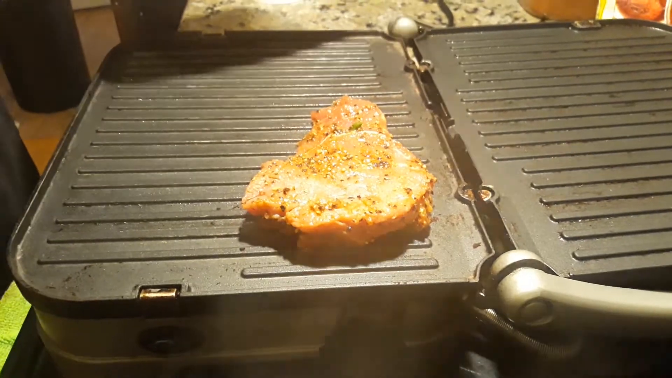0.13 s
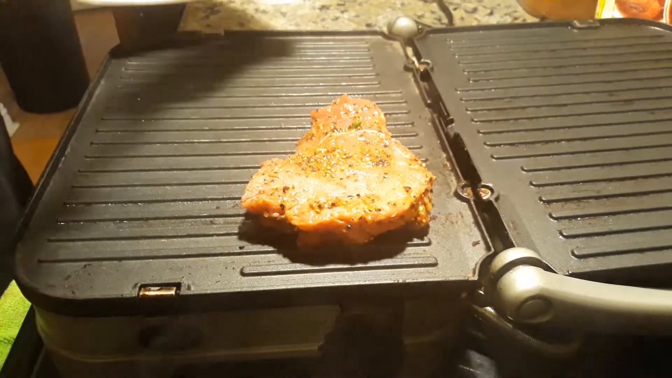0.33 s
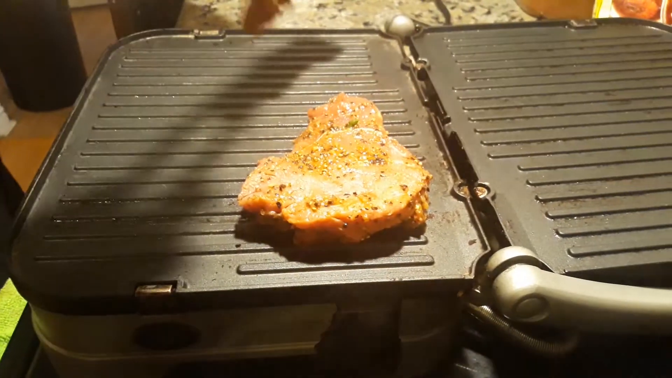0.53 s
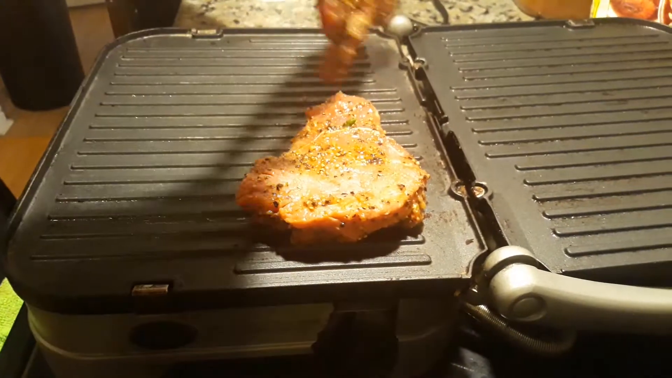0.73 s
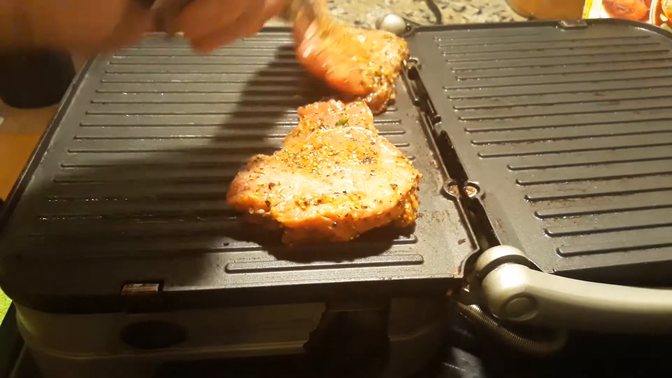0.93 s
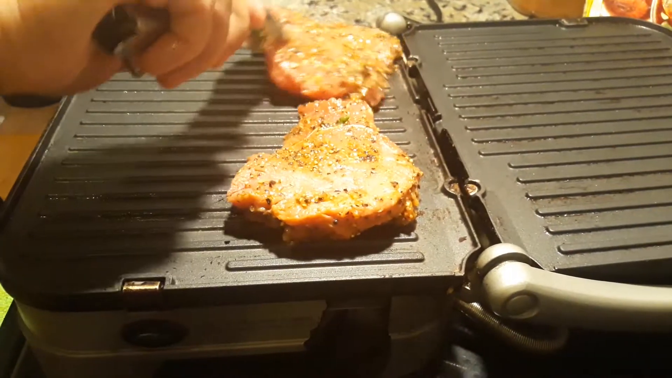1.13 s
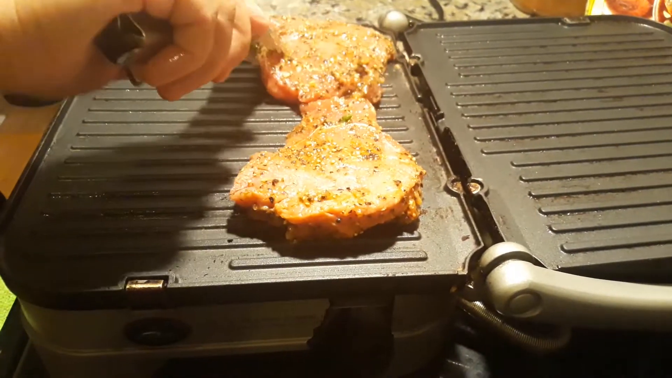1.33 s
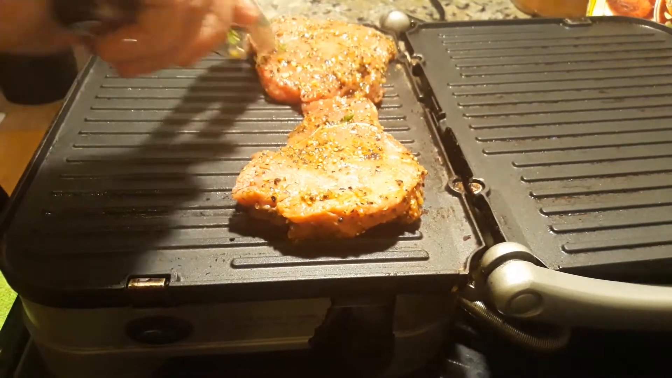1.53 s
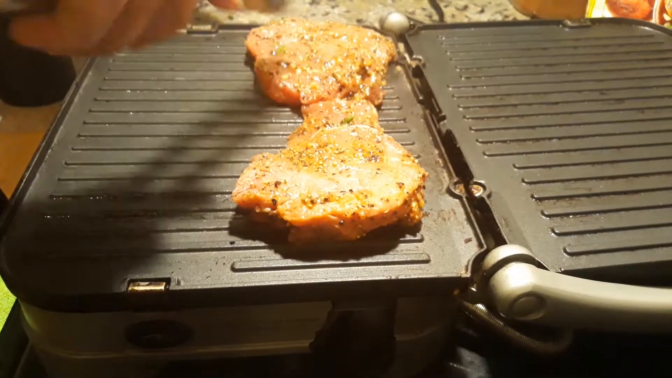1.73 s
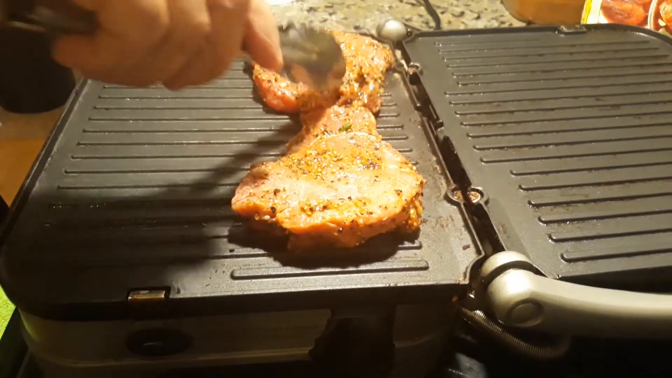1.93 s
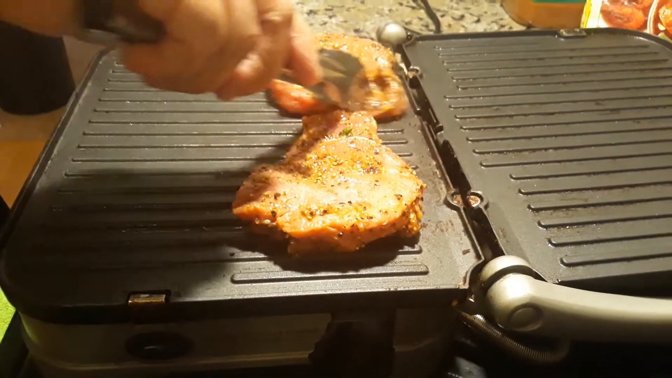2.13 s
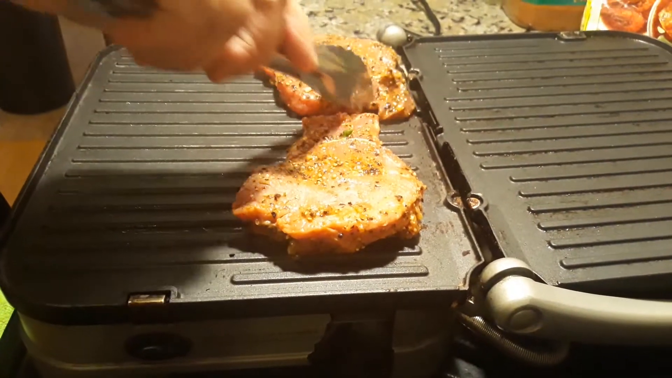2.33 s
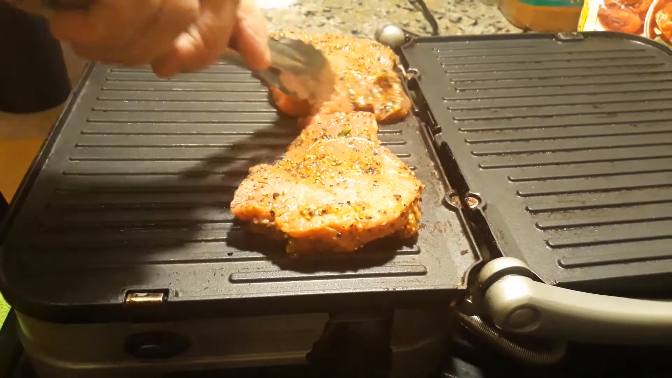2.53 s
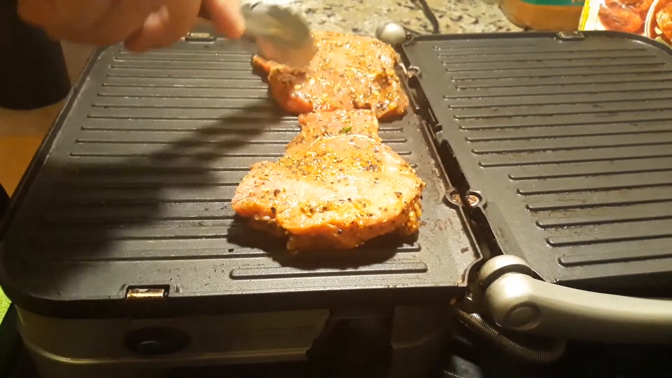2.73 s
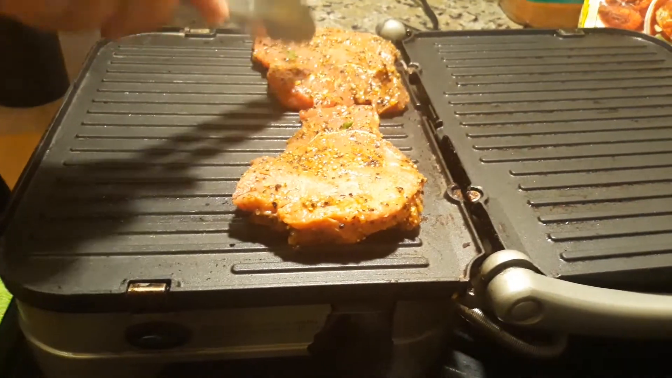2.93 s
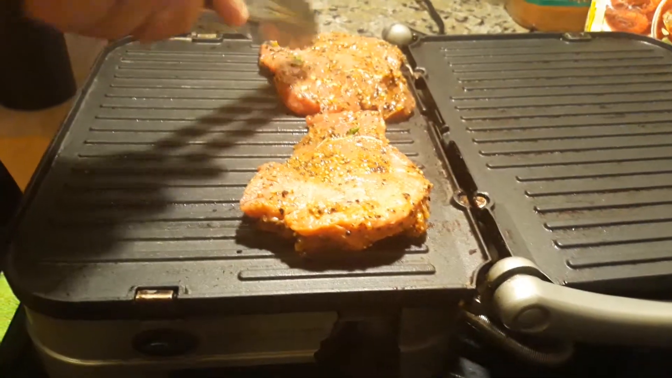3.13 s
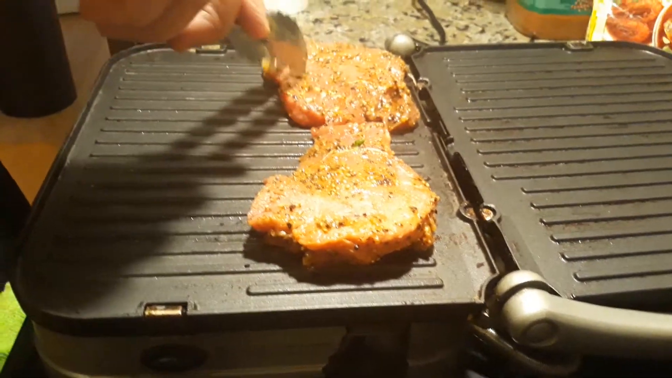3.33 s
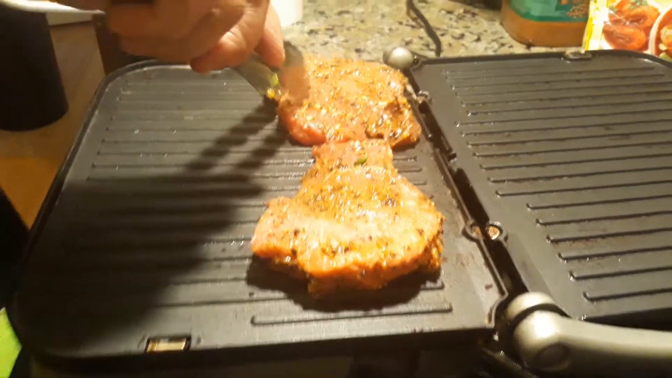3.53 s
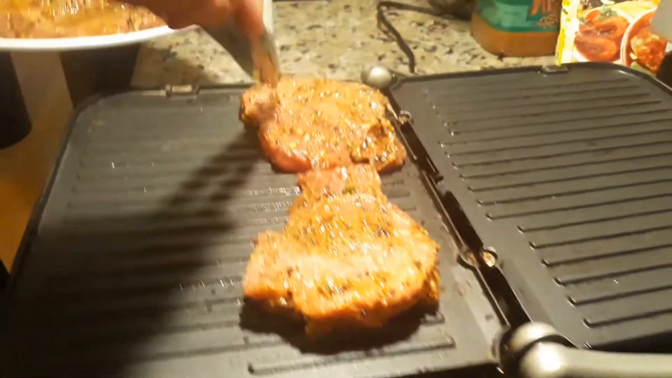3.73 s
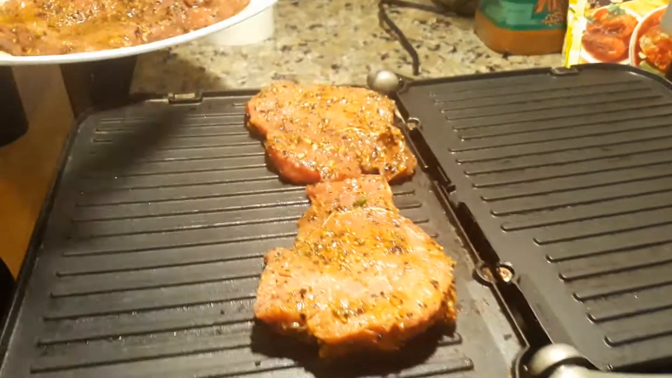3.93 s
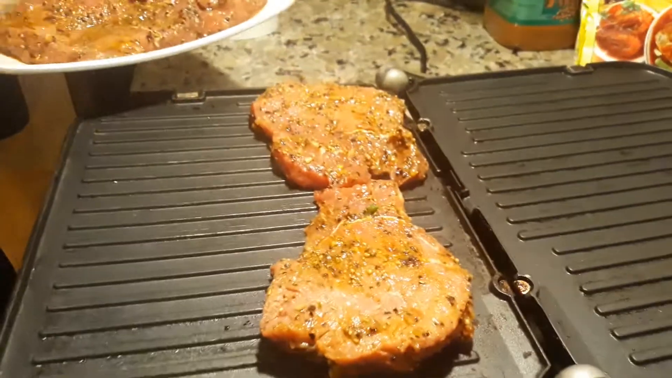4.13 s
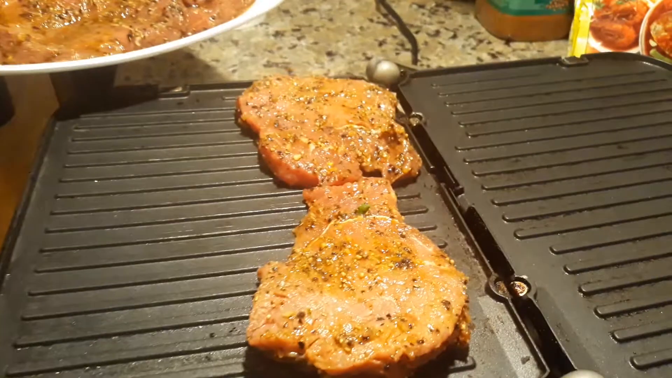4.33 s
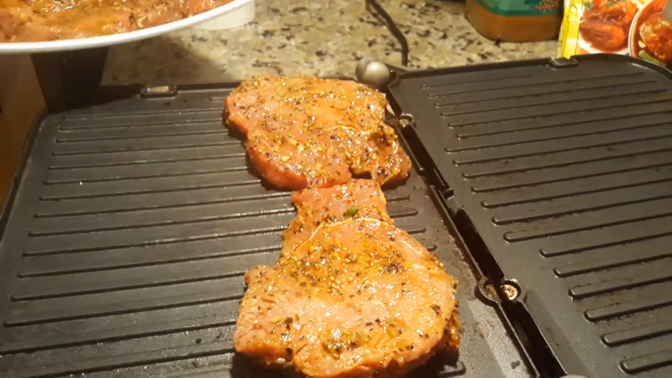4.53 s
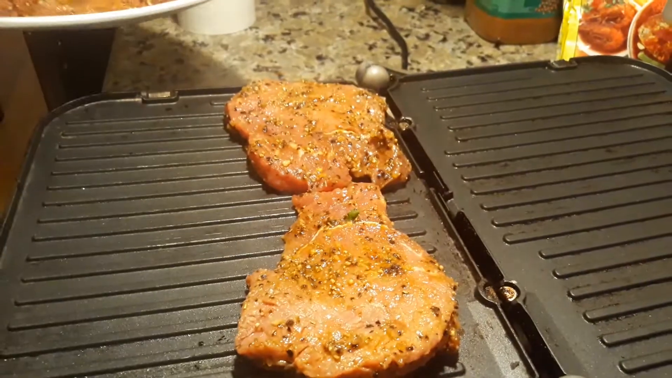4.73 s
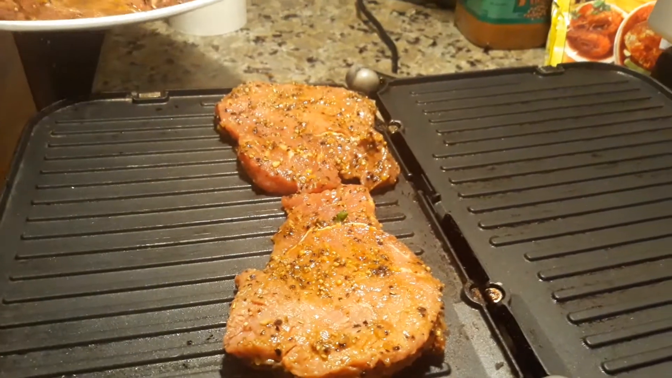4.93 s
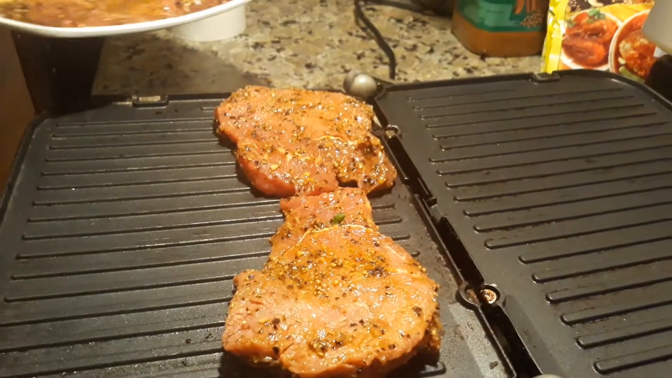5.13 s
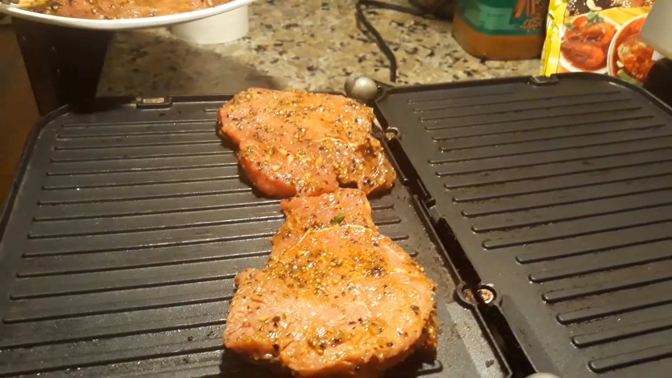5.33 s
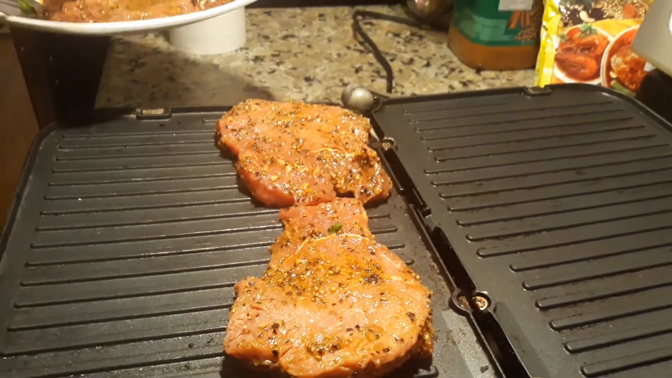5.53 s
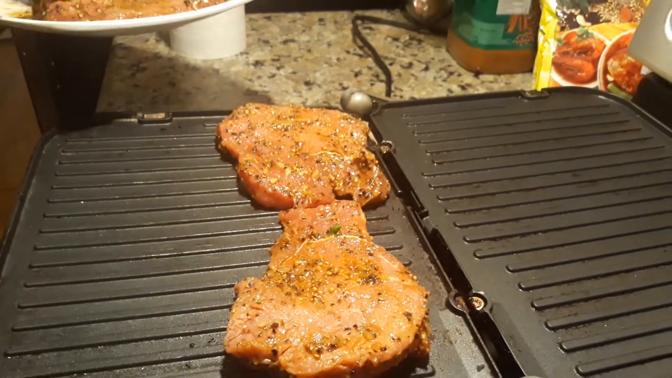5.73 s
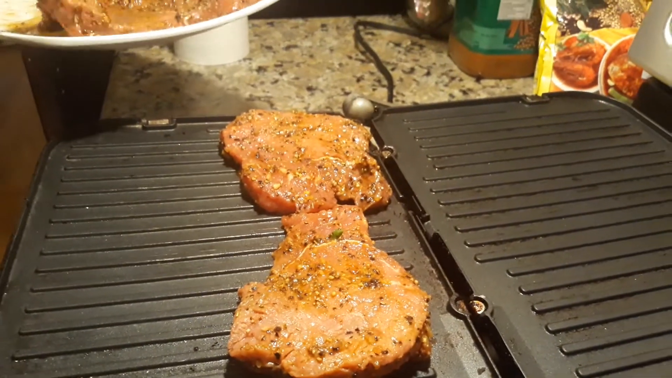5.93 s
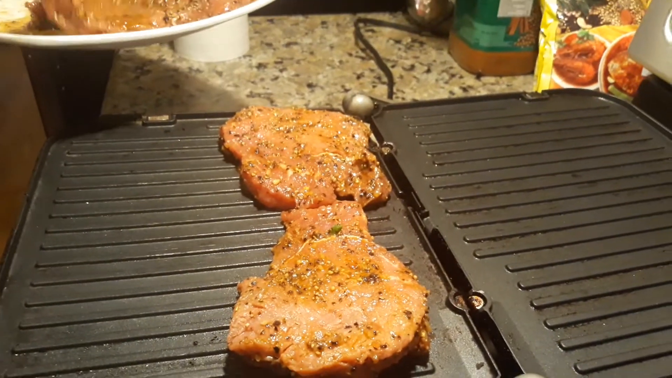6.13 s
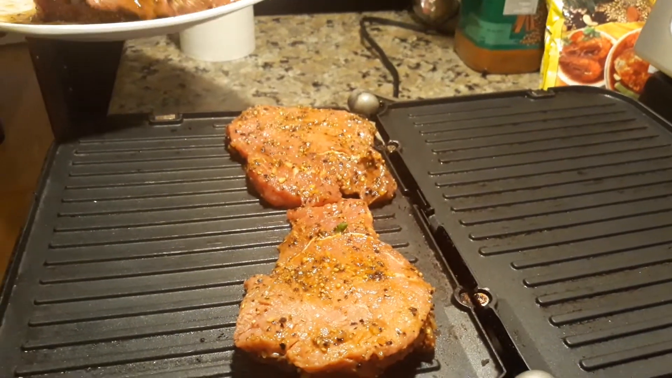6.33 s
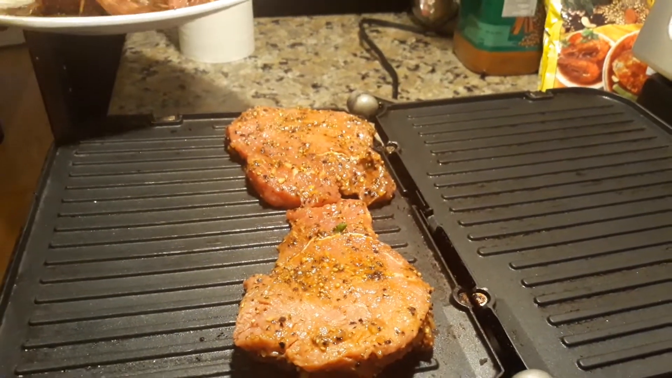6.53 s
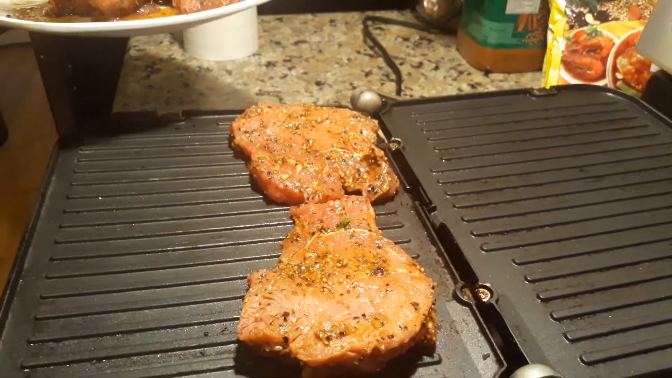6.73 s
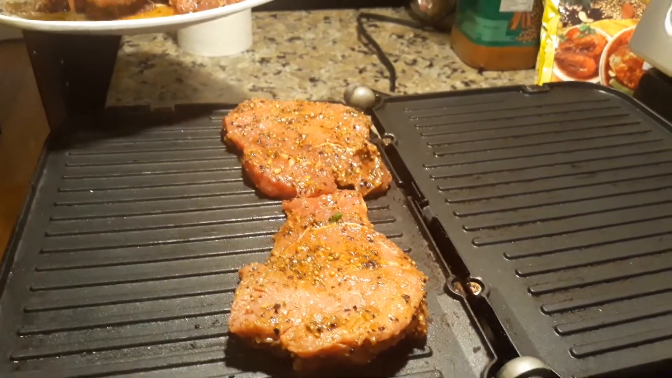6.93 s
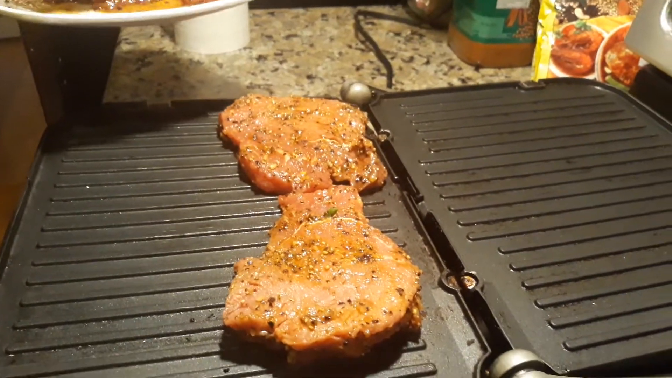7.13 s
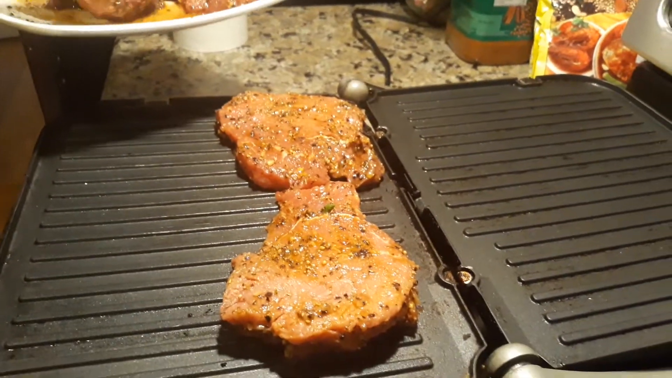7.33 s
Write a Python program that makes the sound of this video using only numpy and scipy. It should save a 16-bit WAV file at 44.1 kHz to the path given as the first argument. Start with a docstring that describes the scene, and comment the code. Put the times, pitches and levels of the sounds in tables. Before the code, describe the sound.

Close, crisp frying hiss with tiny fat spits surges when more meat is laid on, then gradually dries out above soft fan drone.

```python
"""Meat sizzles on a ridged electric grill in a kitchen, heard from a phone just above it, over a droning fan.
First it fries while an arm reaches over: the right side gets louder, a low rumble swells, fat spits.
At about 0.8 s a second, wet piece flops down; the sizzle swells, steam sounds the grooves, noise bands pass.
Kitchenware knocks softly at 3 s; from 3.5 s the groove note sinks and fat spits again.
From 4 s the sizzle sinks as the meat dries, with a last group of knocks at 6.4 s.
"""
import sys
import numpy as np
from scipy import signal
from scipy.fft import rfft, irfft, next_fast_len
from scipy.io import wavfile

SR = 44100
rng = np.random.default_rng(int(sys.argv[2]) if len(sys.argv) > 2 else 0)


def wav_out(sig):
    """Save sig, one row per channel (or a flat mono array), as 16-bit PCM at SR to the path in sys.argv[1]."""
    wavfile.write(sys.argv[1], SR, np.round(np.clip(np.atleast_2d(sig).T, -1, 1) * 32767).astype(np.int16))


N = 329868
T = np.arange(N) / SR
LEFT_RIGHT_HALVES = np.array([[.5], [-.5]])  # shares a left-minus-right lean between the channels

# spectrum of the sizzle: (frequency [Hz], density [dB per Hz])
SIZZLE_COLOUR = [(1000, -24), (1400, -17), (1850, -13.5), (2100, -9), (2500, -7), (3200, -4), (3900, -4),
                 (4600, -3), (6000, -1), (7200, -0.5), (8000, -7.5), (8700, -7.5), (10700, -9), (12400, -5),
                 (15600, -4.5)]
# stereo lean of the sizzle: (frequency [Hz], left minus right [dB])
SIZZLE_LEAN = [(60, -7), (110, 0.0), (200, 0.5), (380, 1.0), (700, 3), (1290, 5), (2380, 3), (4400, -2.5),
               (8120, -1.0), (15000, 0)]
# arm over the grill: (start [s], attack [s], hold [s], release [s])
ARM_REACH = (0.31, 0.68, 0.2, 0.72)
REACH_RIGHT_DB = 4
FRY_DB = -28.5  # reference level of the first piece
SPATTER_DB, FIZZ_START_DB, MIST_DB = -13.5, -9.5, -2.5  # relative to FRY_DB
FIZZ_FADE_DB_PER_S = 0.42
MIST_LAG = 0.55  # share of a rise in dB that the mist band does not follow


def sizzle():
    """One crackle split into four rising bands (spatter, fry, fizz, mist), each with its own level."""
    boil_db = boiling()
    popping = crackle()
    popping = popping + undb(-10.5) * chirps(per_s=800, lo_hz=1898.6, hi_hz=12986, ring_s=0.0035, spread_db=1.0)
    popping = shape(
        popping,
        lambda hz: contour(SIZZLE_COLOUR, hz) * contour(SIZZLE_LEAN, hz) ** LEFT_RIGHT_HALVES)

    spatter_db = SPATTER_DB + 0.78 * walk(9.8)
    fry_db = -0.42 + 0.3 * walk(21)
    fizz_db = FIZZ_START_DB - FIZZ_FADE_DB_PER_S * T + 0.41 * walk(20)
    mist_db = MIST_DB - MIST_LAG * np.maximum(boil_db, 0) + 0.54 * walk(25)

    spatter = unit(band(popping, 1090, 2600, order=24)) * undb(spatter_db)
    fry = unit(band(popping, 2530, 8500, order=24)) * undb(fry_db)
    fizz = unit(band(popping, 8820, 11380, order=24)) * undb(fizz_db)
    mist = unit(band(popping, 11180, 17600, order=24)) * undb(mist_db)
    right_db = REACH_RIGHT_DB * envelope(*ARM_REACH) * np.array([[0], [1]])
    return (spatter + fry + fizz + mist) * undb(FRY_DB + boil_db + right_db)


def crackle(count=8):
    """Several spots under the meat, each spitting in its own uneven spurts."""
    out = 0
    for _ in range(count):
        spurts = undb(0.93 * np.tanh(walk(9)) + 1.2 * np.tanh(walk(50)))
        spot = bursts(per_s=1700, spread_db=2.0, largest_db=19) * spurts
        room = kitchen(t60=0.34, wet_db=-2.0, near_db=-1, near_t60=0.015)
        out = out + signal.oaconvolve(spot[None], room, axes=1)[:, :N]
    return unit(out)


def bursts(per_s, spread_db, largest_db):
    """Steam bubbles bursting at random as single impulses: very many small, a few large."""
    size_db = np.minimum(spread_db * rng.exponential(size=N), largest_db)
    happens = rng.random(N) < per_s / SR
    return happens * undb(size_db) * rng.choice([-1, 1], N)


def chirps(per_s, lo_hz, hi_hz, ring_s, spread_db):
    """Short random chirps, each at its own pitch and balance, that give the sizzle a grainy tone."""
    out, t = np.zeros((2, N + SR)), T[:SR // 32]
    for when, pitch, size, length, glide, place, phase in rng.random((int(per_s * N / SR), 7)):
        hz = lo_hz * (hi_hz / lo_hz) ** pitch
        age = t / (ring_s * (.5 + length))
        ring = undb(-spread_db * np.log(size + .04)) * age * np.exp(-age)
        turns = hz * t * (1 + (glide - .5) * t)
        balance = np.array([[.5 + place], [1.5 - place]])
        phase_turns = np.array([[phase], [0]])
        tone = balance * np.sin(2 * np.pi * (turns + phase_turns))
        out[:, int(when * N):][:, :len(t)] += ring * tone
    return unit(out[:, :N])


# wet meat or juice on hot metal: (start [s], hold [s], rise (negative: fall) [dB])
SURGES = [(1.172, 0.54, 2), (1.973, 0.048, 0.9), (2.463, 0.016, -2), (2.73, .03, 0.2), (3.02, 0.084, 1.0),
          (3.78, 0.092, 0.2), (4.177, 0.043, 0.5), (7.337, 0.092, 1)]
# brief lulls: (start [s], depth [dB])
LULLS = [(2.29, 1.8), (2.65, 1.4), (3.61, 3), (4.45, 1.8), (4.66, 1.7), (7.05, 2)]
SURGE_ATTACK_S, SURGE_RELEASE_S = 0.09, 0.19
LULL_FALL_S, LULL_RECOVER_S = 0.035, 0.08
LAID_S, SETTLE_S, SECOND_PIECE_DB = 0.96, 0.53, 2.5
DRYING_S, DRYING_DB_PER_S = 4.04, 1.33


def boiling():
    """Boil strength in dB over the first piece: second piece settling, surges, lulls, slow drying."""
    surges_db = sum(db * envelope(s, SURGE_ATTACK_S, hold, SURGE_RELEASE_S) for s, hold, db in SURGES)
    lulls_db = sum(db * envelope(s, LULL_FALL_S, 0, LULL_RECOVER_S) for s, db in LULLS)
    second_db = SECOND_PIECE_DB * ramp(LAID_S, SETTLE_S)
    drying_db = DRYING_DB_PER_S * np.maximum(T - DRYING_S, 0)
    return second_db + surges_db - lulls_db - drying_db


# sharp spits of fat: (time [s], level before band and balance [dB])
SPITS = [(.493, -4), (.580, -5), (3.990, -7), (4.353, -8)]


def spits():
    """Drops of fat pop off to the right: noise cracks of about a millisecond."""
    crack = sum(undb(db) * np.exp(-np.abs(T - s) / 0.00069) for s, db in SPITS)
    balance_db = np.array([[-12], [-5]])
    return band(crack * rng.standard_normal((2, N)), 3000, 15000) * undb(balance_db)


# passing noise bands, narrow to broad, that colour the hiss:
# (start [s], end [s], mean centre [Hz], width [Hz], level [dB])
PASSING_BANDS = [(0, 1.1, 3710, 170, -45), (0, 0.75, 2450, 130, -45.5), (1.1, 1.95, 2680, 150, -39),
                 (1.05, 1.8, 3702, 1000, -34.5), (1.2, 2.3, 2200, 220, -41), (1.2, 2.9, 4674, 400, -37),
                 (1.2, 2.35, 6900, 250, -42), (2.2, 7.7, 2645, 148, -47.5), (3.6, 4, 7380, 450, -36),
                 (4.4, 7.7, 3260, 300, -48)]
# resonances of grill and worktop: (frequency [Hz], width [Hz], relative level [dB])
HOLLOWS = [(569, 46, 2.5), (712.4, 48, 2), (1020, 83, 4.5), (1073, 195, -1.5)]
GROOVE_DB, GROOVE_RISE_DB, GROOVE_BUILD_S = -47.5, 11, 0.91  # level once steam has built up
GROOVE_HZ, GROOVE_SAG_HZ, SAG_START_S, SAG_S = 1323, 75.5, 3.5, 0.8  # sinks as the meat is let go
BAND_FADE_S = 0.14  # in and out
THIN_HISS_HZ, THIN_HISS_DB = 7270, -11.5  # mean centre; level relative to FRY_DB


def steam():
    """Steam sounds the grooves, hisses in steady and passing bands and rings the grill's hollows."""
    boil_db = boiling()
    trapped = ramp(LAID_S, GROOVE_BUILD_S)
    flow_db = boil_db - SECOND_PIECE_DB - GROOVE_RISE_DB * (1 - trapped)

    groove_hz = GROOVE_HZ - GROOVE_SAG_HZ * ramp(SAG_START_S, SAG_S)
    groove_hz = groove_hz * (1 + 0.00398 * walk(6))
    out = noise_band(groove_hz, width_hz=105, sputter_db=1.0) * undb(GROOVE_DB + flow_db)

    thin_hz = THIN_HISS_HZ * (1 + .03 * walk(70))
    out += noise_band(thin_hz, width_hz=500, sputter_db=2.5) * undb(FRY_DB + THIN_HISS_DB + boil_db)

    for start, end, hz, width_hz, db in PASSING_BANDS:
        fade = ramp(start, BAND_FADE_S) - ramp(end - BAND_FADE_S, BAND_FADE_S)
        out += fade * noise_band(hz * (1 + .01 * walk(5)), width_hz, sputter_db=2.0) * undb(db)

    hollow = shape(
        diffuse(apart_hz=2300),
        lambda hz: sum(undb(db) * resonance(hz, f, w) ** 2 for f, w, db in HOLLOWS))
    return out + unit(hollow) * undb(-47.5 + 0.5 * flow_db)


def noise_band(hz, width_hz, sputter_db):
    """Low-passed noise on a moving carrier: a sputtering noise band around its pitch."""
    pole = np.exp(-np.pi * width_hz / SR)
    mid, side = signal.lfilter([1], np.poly([pole, pole]), rng.standard_normal((2, N)))
    side = side * min(hz.mean() / 2600, 1)  # low notes reach both microphones more alike
    carrier = np.cos(2 * np.pi * np.cumsum(hz) / SR)
    return unit(np.array([mid + side, mid - side]) * carrier) * undb(sputter_db * walk(25))


# soft knocks: (time [s], level [dB], relative thud [dB], decay t60 [s], excited band centre [Hz])
KNOCKS = [(.795, -44, -6, .1, 420), (.820, -39, -2.5, 0.11, 400), (3.028, -33.5, -30, 0.05, 290),
          (6.421, -31, -45, .025, 400), (6.428, -36, -45, 0.11, 620), (6.436, -36, -45, 0.09, 620),
          (6.458, -39, -45, 0.12, 380)]
# modes they ring: (mean frequency [Hz], relative level [dB])
KNOCK_MODES = [(330, -4), (410, 4.5), (510, 5), (585, 6), (670, -9), (1410, 3)]
KNOCK_SPREAD_HZ = 300  # width of the band one knock excites


def knocks():
    """Meat flops down and kitchenware is nudged: damped modes, a low thud and a little room."""
    out, t = np.zeros(N + SR), T[:SR // 2]
    for s, db, thud_db, t60, centre_hz in KNOCKS:
        ring = 0
        for hz, mode_db in KNOCK_MODES:
            excited = undb(mode_db) * abs(resonance(hz, centre_hz, KNOCK_SPREAD_HZ))
            detuned_hz = hz * (1 + 0.017 * rng.standard_normal())
            ring = ring + excited * np.cos(2 * np.pi * detuned_hz * t) / 2
        thud = undb(thud_db) * np.sin(2 * np.pi * 135 * t)
        out[int(s * SR):][:len(t)] += undb(db - 60 * t / t60) * (ring + thud)
    room = kitchen(t60=.3, wet_db=-5, near_db=-25, near_t60=.02)
    return signal.fftconvolve(band(out[None, :N], 82, 3000, order=4), room, axes=1)[:, :N]


# fan air spectrum: (frequency [Hz], density [dB per Hz])
FAN_COLOUR = [(25, -24), (60, -20), (100, -18), (135, -10.5), (175, -1), (280, -2), (400, -1), (600, -1.5),
              (750, 3), (870, -7), (1500, -4.5), (3000, -20.5)]
# rumble spectrum: (frequency [Hz], density [dB per Hz])
RUMBLE_COLOUR = [(30, -28), (60, -12), (95, -17), (120, -4), (170, -1.5), (215, -0.5), (280, -14),
                 (450, -30)]
# motor hum: (frequency [Hz], level at rest [dB], share of the swell [ratio])
HUM = [(121.4, -68.5, 0.68), (202.4, -62.5, 0.081), (351.6, -62, 0)]
AIR_DB, AIR_LEAN_DB = -46, 1.6  # lean: left minus right
RUMBLE_DB, HUM_RISE_DB = -49, 15  # at full swell


def fan():
    """A rush of air with a motor hum; the low end swells while the arm is over the grill."""
    air = unit(shape(diffuse(apart_hz=1530), lambda hz: contour(FAN_COLOUR, hz)))
    air = air * undb(AIR_DB + .5 * walk(5.2) + AIR_LEAN_DB * LEFT_RIGHT_HALVES)
    swell = np.maximum(envelope(*ARM_REACH), 0) ** 0.79
    rumble = unit(shape(diffuse(apart_hz=1400), lambda hz: contour(RUMBLE_COLOUR, hz)))
    rumble = rumble * undb(RUMBLE_DB) * swell
    hum = 0
    for hz, db, share in HUM:
        wavering = undb(2 * walk(4)) * np.sin(2 * np.pi * hz * T + .5 * walk(5))
        hum = hum + undb(db + share * HUM_RISE_DB * swell) * wavering
    return air + rumble + hum


def kitchen(t60, wet_db, near_db, near_t60):
    """Stereo response from one spot: direct sound, quick echoes off lid and worktop, short room tail."""
    t = T[:SR // 3]
    decay = undb(-60 * t / np.array([near_t60, t60])[:, None, None])
    near, tail = rng.standard_normal((2, 2, len(t))) * decay
    response = undb(near_db) * near / np.linalg.norm(near[0])
    response = response + undb(wet_db) * tail / np.linalg.norm(tail[0])
    lag = rng.integers(3, 6)  # samples; the right microphone is further away
    response[0, 0] += 1
    response[1, lag] += 1
    return response


def diffuse(apart_hz=1500):
    """Noise at two microphones: alike in the bass, unrelated in the treble."""
    mid, side = rng.standard_normal((2, N))
    side = shape(side, lambda hz: hz / np.hypot(hz, apart_hz))
    return np.array([mid + side, mid - side])


def walk(rate):
    """Slow chance: random levels, rate a second, joined by straight lines; spread near 1."""
    levels = 1.2 * rng.standard_normal(int(T[-1] * rate) + 3)
    return np.interp(T * rate + rng.random(), np.arange(len(levels)), levels)


def ramp(start_s, length_s):
    """Rises from 0 to 1 and stays there."""
    return np.clip((T - start_s) / length_s, 0, 1)


def envelope(start_s, attack_s, hold_s, release_s):
    """Attack, hold and release between 0 and 1."""
    return ramp(start_s, attack_s) - ramp(start_s + attack_s + hold_s, release_s)


def undb(db):
    """Decibels to gain."""
    return 10 ** (np.asarray(db) / 20)


def unit(x):
    """Scale a stereo pair so that its centre has rms 1."""
    return x / np.std(x.mean(axis=0))


def shape(x, gain):
    """Filter by a gain given as a function of frequency."""
    size = next_fast_len(N + 8192)
    hz = np.maximum(np.arange(size // 2 + 1) * SR / size, 1)
    return irfft(rfft(x, size) * gain(hz), size)[..., :N]


def contour(points, hz):
    """Gain of (frequency [Hz], level [dB]) points joined on a log-frequency axis."""
    f, db = np.transpose(points)
    return undb(np.interp(np.log(hz), np.log(f), db))


def resonance(hz, centre_hz, width_hz):
    """Response of one damped resonance, gain 1 at its centre."""
    return 1 / (1 + 1j * (hz ** 2 - centre_hz ** 2) / (hz * width_hz))


def band(x, lo_hz, hi_hz, order=8):
    """Smooth band-pass."""
    return shape(x, lambda hz: 1 / (1 + (lo_hz / hz) ** order) / (1 + (hz / hi_hz) ** order))


def scene():
    """Everything at the phone."""
    return sizzle() + spits() + steam() + knocks() + fan()


TOP_HZ = 15750


def record(dry):
    """The phone cuts the top with a steep low-pass."""
    return signal.sosfilt(signal.ellip(12, .1, 80, TOP_HZ, fs=SR, output="sos"), dry)


dry = scene()
out = record(dry)
wav_out(out)
```